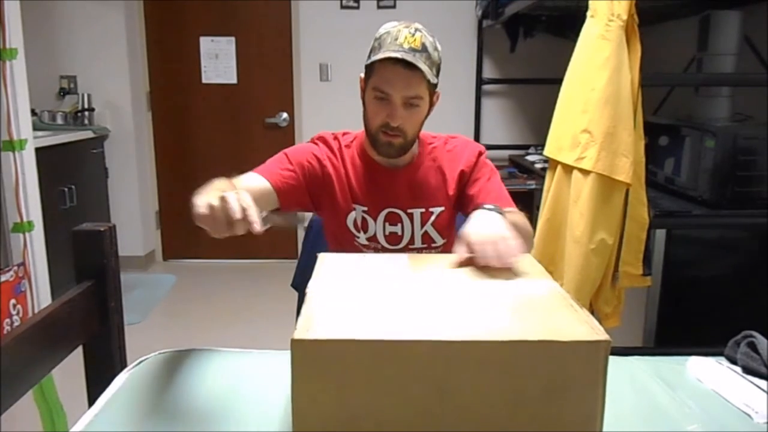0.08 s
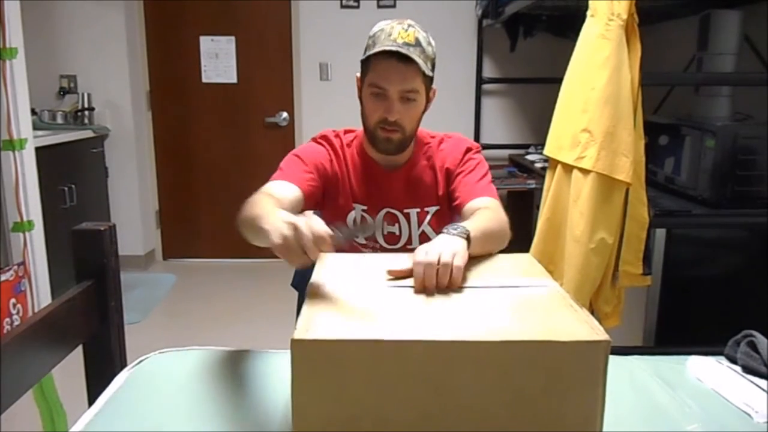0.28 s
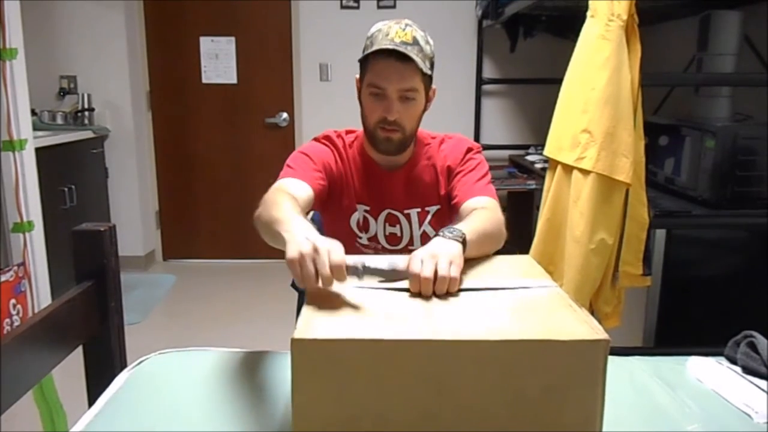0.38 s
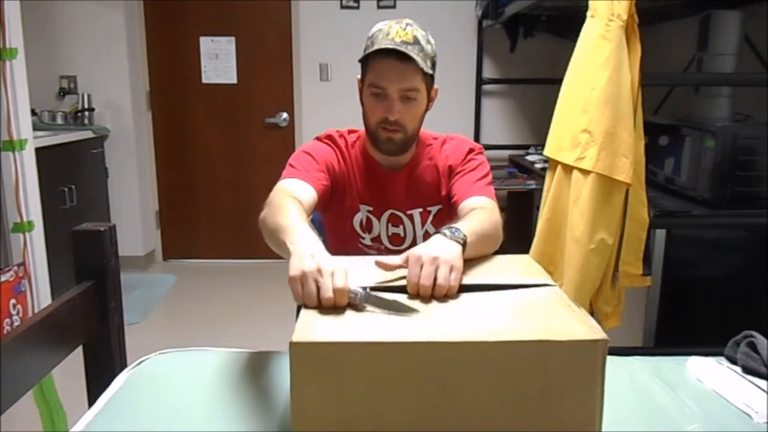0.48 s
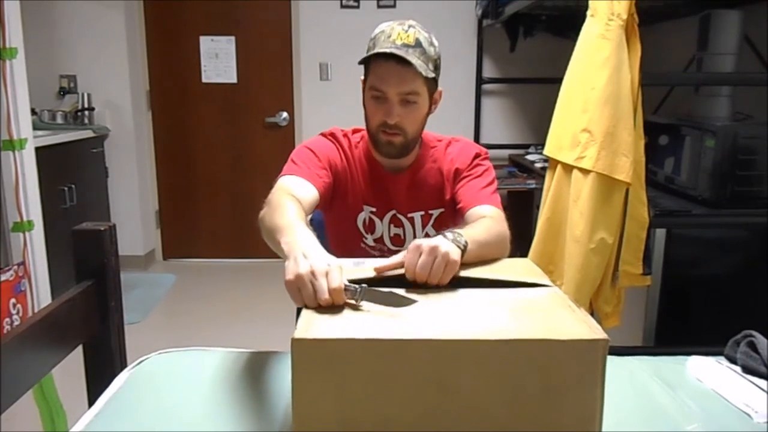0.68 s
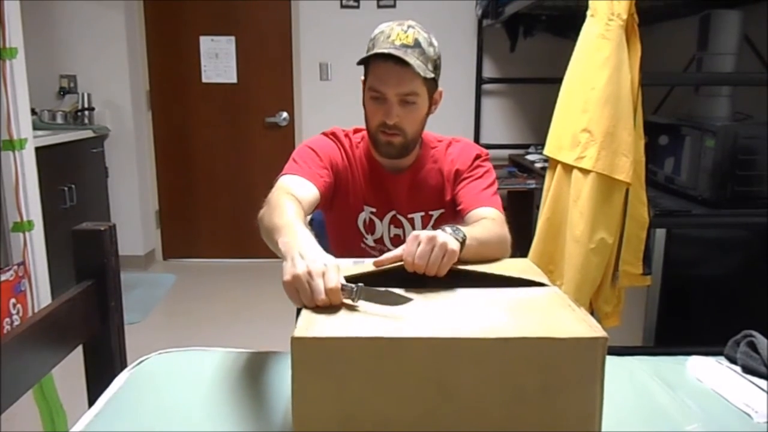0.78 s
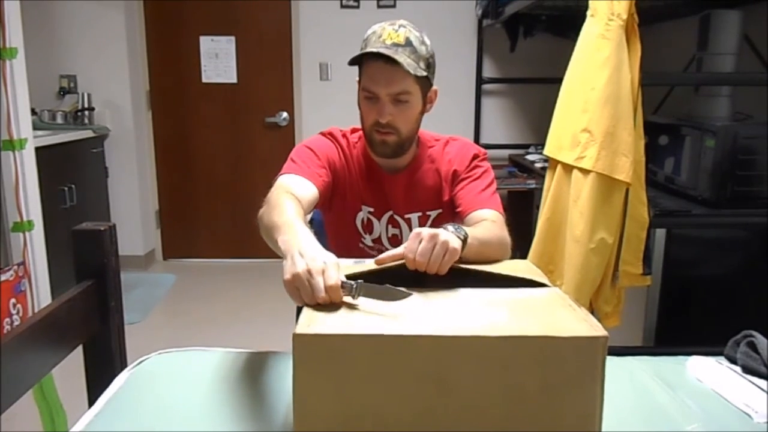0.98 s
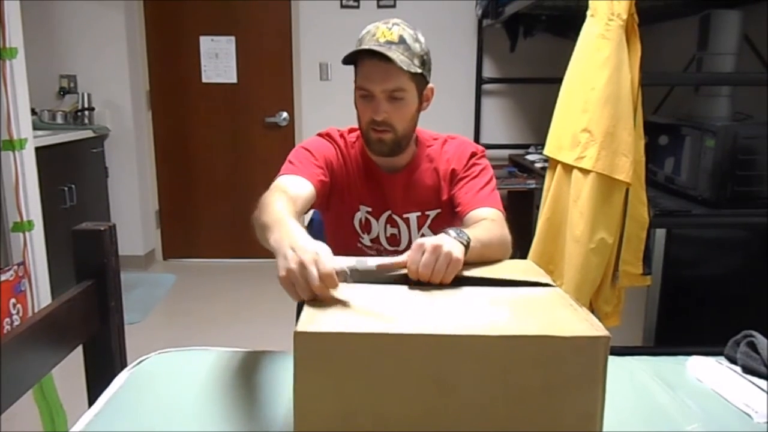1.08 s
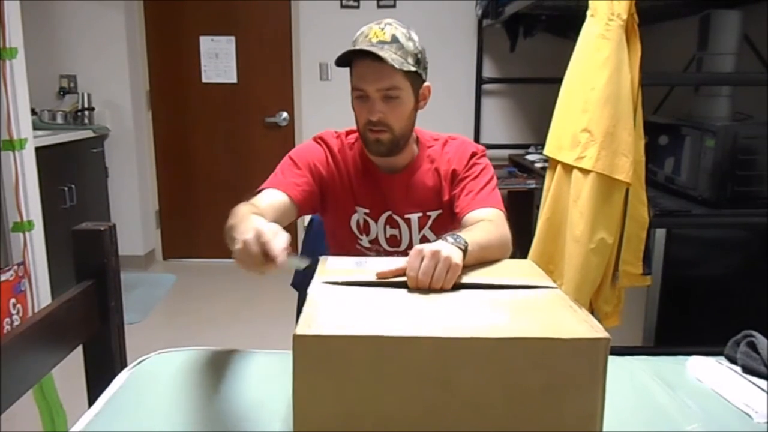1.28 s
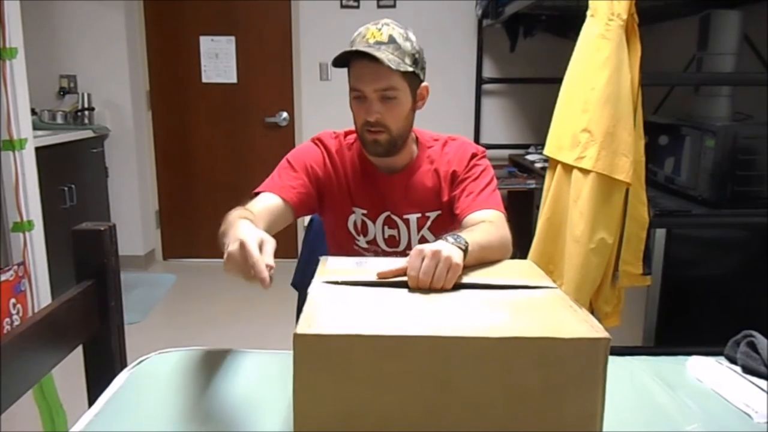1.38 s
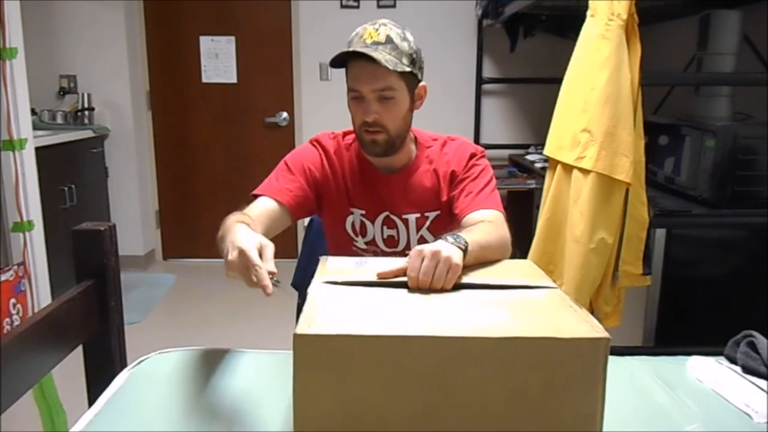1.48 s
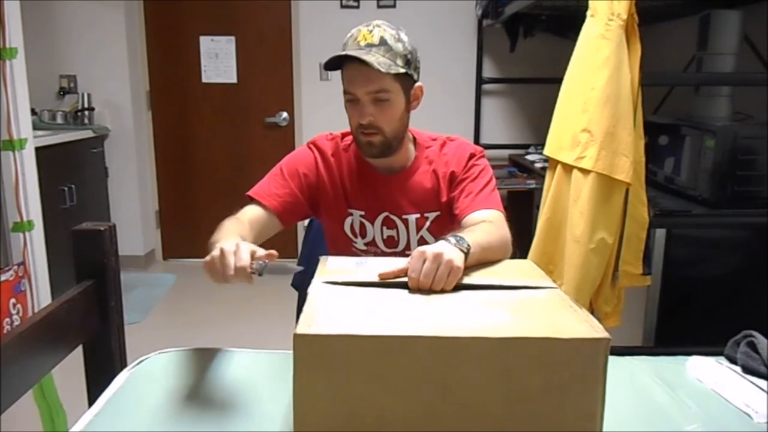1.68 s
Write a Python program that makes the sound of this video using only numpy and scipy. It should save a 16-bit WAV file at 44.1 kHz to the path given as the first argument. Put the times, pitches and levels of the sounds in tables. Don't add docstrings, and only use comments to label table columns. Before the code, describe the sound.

A knife cuts packing tape on a cardboard box: gritty scraping, sharp tape snaps and hollow knocks, then a last small rattle, fading into soft vent hum in a bare, live room, heard by a small nearby camera.

```python
import sys
import numpy as np
from scipy import signal
from scipy.fft import rfft, irfft, dct
from scipy.io import wavfile
from scipy.ndimage import uniform_filter1d

SR = 44100
rng = np.random.default_rng(int(sys.argv[2]) if len(sys.argv) > 2 else 0)


def invert_db(level):
    return 10 ** (np.asarray(level, dtype=float) / 20)


def waveform_to_disk(signal):
    frames = np.transpose(np.atleast_2d(signal))
    scaled = np.clip(frames, -1, 1) * 32767
    samples = np.round(scaled).astype(np.int16)
    wavfile.write(sys.argv[1], SR, samples)


N = 74970

# pitch_hz, width_hz, level_db
BOX_RESONANCES = [(557, 270, -3), (1167, 266, 4), (1496, 390, 2.5), (1765, 130, 5.5), (2054, 300, 3),
                  (2396, 210, 5), (2661, 430, 3.5), (3860, 1500, -1)]


def band(x, hz, width):
    return signal.lfilter(*signal.iirpeak(min(hz, .45 * SR), hz / width, fs=SR), x)


def unit(x):
    return x / np.sqrt(np.mean(x ** 2))


def walk(per_s):
    k = int(SR / per_s)
    smooth = uniform_filter1d(rng.standard_normal(N), k)
    return unit(uniform_filter1d(smooth, k))


def coloured(points):
    point_hz, point_db = np.array(points).T
    hz = np.maximum(np.fft.rfftfreq(N, 1 / SR), 1)
    gain = invert_db(np.interp(np.log(hz), np.log(point_hz), point_db))
    return unit(irfft(rfft(rng.standard_normal(N)) * gain, N))


def body(x, peaks):
    out = np.zeros(len(x))
    for k, (hz, width, db) in enumerate(peaks):
        out += (-1) ** k * invert_db(db) * band(x, hz, width)
    return out


def slips(per_s, spread_db):
    chance, sign, size = rng.random((3, N))
    size_db = np.minimum(-spread_db * np.log(1 - size), 9)
    return unit((chance < per_s / SR) * np.sign(sign - .5) * invert_db(size_db))


def vent():
    # pitch_hz, level_db (per Hz)
    air_spectrum = [(15, -43), (25, -27.5), (189, -20), (424, -12.5), (1390, -14), (1660, -26),
                    (2890, -23.5), (8360, -41.5), (10500, -49), (13600, -87), (22000, -120)]
    air = invert_db(-51 + walk(3.6)) * coloured(air_spectrum)
    duct_hz, duct_width_hz, duct_db = 425, 70, -55.5
    hum = band(rng.standard_normal(N), duct_hz, duct_width_hz)
    hum = unit(band(hum, duct_hz, 2 * duct_width_hz))
    return air + invert_db(duct_db) * hum


def drag(t):
    # time_s, pressure_db, brightness_db
    strokes = [(0, -38, -2.5), (0.052, -41.5, -1), (0.104, -42.5, 4.5), (.17, -54.5, -41), (0.229, -59, -3),
               (0.244, -38.5, 5), (.3, -32.5, -15.5), (.36, -30, -0.5), (.41, -37, -16), (0.468, -37, 2.5),
               (0.561, -35.5, -9.5), (.7, -37, 3), (0.761, -28.5, -3.5), (.82, -39, -3.5), (1.0, -55, 0),
               (1.111, -41, -1.5), (1.199, -39.5, -1), (1.3, -63.5, -3.5)]
    # pitch_hz, width_hz, level_db
    tape_resonances = [(4600, 530, 10.5), (5750, 3600, -0.5), (8230, 2750, -4), (10300, 1500, -14.5)]
    slips_per_s, spread_db, patchy_db, tape_db = 9000, 2.5, 1.8, -2
    time_s, pressure_db, brightness_db = np.array(strokes).T

    clicks = slips(slips_per_s, spread_db) * invert_db(patchy_db * walk(89))
    card = unit(body(clicks, BOX_RESONANCES))
    tape = unit(body(clicks, tape_resonances))
    both = card + invert_db(tape_db + np.interp(t, time_s, brightness_db)) * tape
    return both * invert_db(np.interp(t, time_s, pressure_db))


def snaps(t):
    # start_s, peak_db, centre_hz, box_share_db
    tape_snaps = [(.006, -27, 2600, -10), (.3017, -19, 6500, -25), (.3123, -14, 6600, -22),
                  (.3163, -7, 6400, -12), (.3178, -14, 7000, -5), (.3297, -13, 7500, -5),
                  (.4305, -27, 9800, -20), (.45, -15, 8500, -4), (.4512, -18, 5000, -4),
                  (.4635, -20, 3800, -8), (.5225, -25, 9000, -8), (.6195, -17, 8500, -12),
                  (.6208, -16, 5500, -12), (.7058, -12, 4200, -4), (.7075, -16, 7000, -2),
                  (.708, -20, 10000, -12), (.9635, -34, 5000, -8), (1.0475, -41, 7000, -8),
                  (1.1238, -20, 1500, -4), (.2372, -29, 2600, -3), (.3722, -21, 1700, -6),
                  (1.149, -20, 4000, -3), (.7555, -20, 3200, -6), (.726, -23, 6000, -4)]
    fade_s, width_ratio = .0005, .5
    out = np.zeros(N)
    for start, db, hz, box_db in tape_snaps:
        burst = rng.standard_normal(N) * (t >= start) * np.exp(-np.abs(t - start) / fade_s)
        crack = band(burst, hz, hz * width_ratio)
        crack = band(crack, hz, hz * width_ratio)
        crack = band(crack, hz, hz)
        jolt = body(burst, BOX_RESONANCES)
        out += invert_db(db) * (crack / np.abs(crack).max() + invert_db(box_db) * jolt / np.abs(jolt).max())
    return out


def knocks(t):
    # start_s, level_db, rattle_length_s, top_hz
    box_knocks = [(0.2337, -33, 0.011, 1810), (0.358, -35.5, 0.015, 2500), (0.37, -29, .012, 3900),
                  (0.393, -27.5, .008, 2500), (0.461, -33.5, 0.015, 3550), (0.7048, -22.5, 0.012, 3000),
                  (0.729, -21, 0.0028, 3500), (0.762, -26, 0.01, 3500), (1.1245, -30, 0.019, 2220),
                  (1.152, -30.5, 0.023, 3500), (1.17, -50, .006, 2900), (1.19, -38, .015, 3000)]
    rattle_per_s, spread_db, fade_s = 2500, 2.2, .0067
    first_touch_db, settle_s = 5, .004
    out = np.zeros(N)
    for start, db, length, top_hz in box_knocks:
        shape = (t >= start) * np.exp(-np.maximum(t - start - length, 0) / fade_s)
        shape = shape * invert_db(first_touch_db * np.exp(-np.abs(t - start) / settle_s))
        softness = signal.butter(2, top_hz, fs=SR)
        contacts = signal.lfilter(*softness, slips(rattle_per_s, spread_db))
        steady_level = np.std(body(contacts, BOX_RESONANCES))
        out += invert_db(db) * body(contacts * shape, BOX_RESONANCES) / steady_level
    return out


def thuds(t):
    # start_s, peak_db, pitch_hz, t60_s
    panel_modes = [(.237, -32.5, 403, .06), (.262, -40, 177, 0.072), (0.38, -36, 127, 0.074),
                   (0.391, -37.5, 250, 0.077), (.45, -46.5, 130, 0.13), (.47, -41, 301, 0.22),
                   (.585, -44.5, 333, 0.26), (.708, -42.5, 127, 0.13), (0.71, -34.5, 238, 0.13),
                   (.709, -14.5, 570, 0.028), (.765, -31, 530, 0.029), (1.0, -61, 96, 0.13),
                   (0.71, -22, 1170, 0.064), (.7062, -26, 1300, 0.039), (.712, -21, 2050, 0.028),
                   (1.12, -27, 1157, 0.057), (1.157, -23, 2400, 0.1), (1.143, -27, 1770, 0.17),
                   (.356, -21, 1500, 0.06), (0.32, -35, 524, 0.11), (.362, -22, 4530, .03),
                   (1.125, -30, 642, 0.086), (1.152, -27, 816, 0.074)]
    out = np.zeros(N)
    for start, db, hz, t60 in panel_modes:
        age = np.maximum(t - start, 0)
        swell = 1 - np.exp(-age * hz)
        out += invert_db(db - 60 * age / t60) * swell * np.sin(2 * np.pi * hz * age)
    return out


def room(x):
    # centre_hz, t60_s, level_db
    decay_bands = [(185, .5, -1), (648, 0.49, 2.5), (2160, .6, -2.5), (4170, 0.56, -3), (8500, 0.51, -6.5)]
    tail_db, gap_s = -9.5, .0033
    t = np.arange(SR) / SR
    tail = np.zeros(SR)
    for hz, t60, db in decay_bands:
        noise = unit(band(rng.standard_normal(SR), hz, hz))
        tail += invert_db(db - 60 * t / t60) * noise * np.sqrt(hz / 2000)
    tail = tail * np.clip(t / gap_s - 1, 0, 1)
    tail = tail / np.linalg.norm(tail)
    return x + invert_db(tail_db) * signal.fftconvolve(x, tail)[:N]


def scene():
    t = np.arange(N) / SR
    at_box = drag(t) + snaps(t) + knocks(t) + thuds(t)
    return (room(at_box) + vent())[None]


def thin_out(x):
    # centre_s, length_s, bar_db (that a low line must clear), top_hz (none above)
    thin_moments = [(.052, .06, 3, 7300), (.172, .056, 0, 9000), (.401, .038, 3, 7300),
                    (.599, .03, 1, 6000), (.731, .026, 0, 8600), (.767, .013, -5, 6300),
                    (.811, .013, -2, 5000), (1.012, .024, -20, 7300), (1.07, .026, -5, 8000),
                    (1.228, .021, -12, 7800), (1.333, .022, -20, 6200), (1.535, .024, -10, 5200)]
    top_bar_db, span_hz, max_gain_db, low_hz = 7.5, 1000, 6, 260
    out = x.copy()
    for centre, length, bar_db, top_hz in thin_moments:
        n = int(length * SR)
        a = int(centre * SR) - n // 2
        fade = np.sqrt(signal.windows.tukey(n, .9))
        hz = np.arange(n) * SR / 2 / n
        lines = dct(x[a:a + n] * fade, norm="ortho")
        near = np.sqrt(uniform_filter1d(lines ** 2, int(span_hz * 2 * length)) + 1e-18)
        bar_hz = [0, low_hz, low_hz + 1, top_hz]
        bar = near * invert_db(np.interp(hz, bar_hz, [bar_db + 8, bar_db + 14, bar_db, top_bar_db]))
        gain = np.minimum(invert_db(max_gain_db), np.maximum(bar / near, 1))
        kept = (np.abs(lines) > bar) * (hz < top_hz) * gain
        out[a:a + n] -= fade * dct(lines * (1 - kept), type=3, norm="ortho")
    return out


def top_cut(x):
    return signal.sosfilt(signal.butter(12, 11170, fs=SR, output="sos"), x)


def record(dry):
    limit, top_hz = 1.2, 10915
    x = limit * np.tanh(dry[0] / limit)
    x = thin_out(x)
    x = signal.sosfilt(signal.cheby2(12, 45, top_hz, fs=SR, output="sos"), x)
    return top_cut(x[None])


dry = scene()
out = record(dry)
waveform_to_disk(out)
```